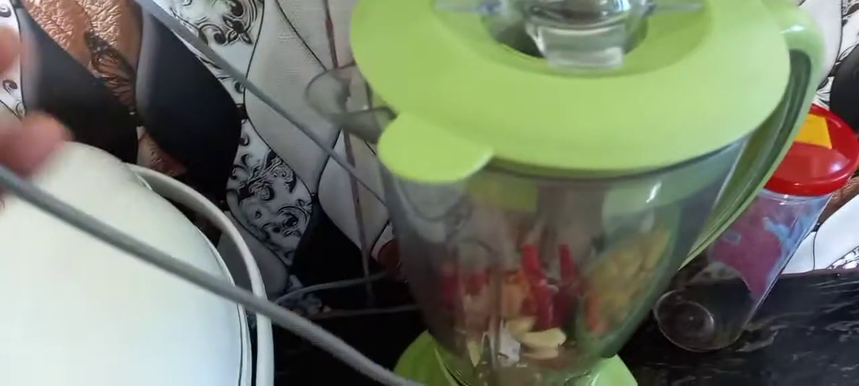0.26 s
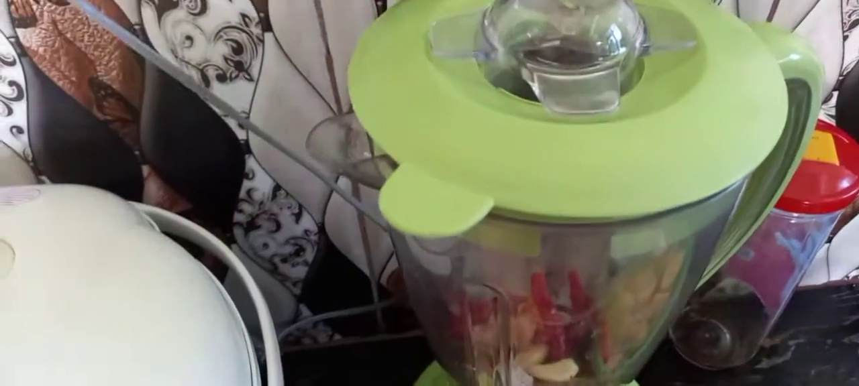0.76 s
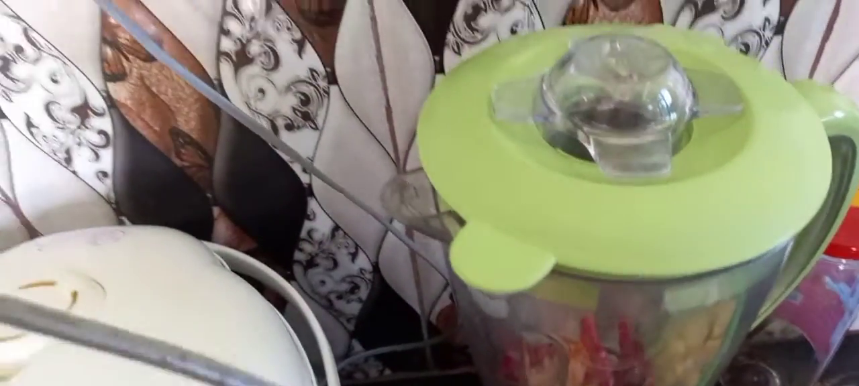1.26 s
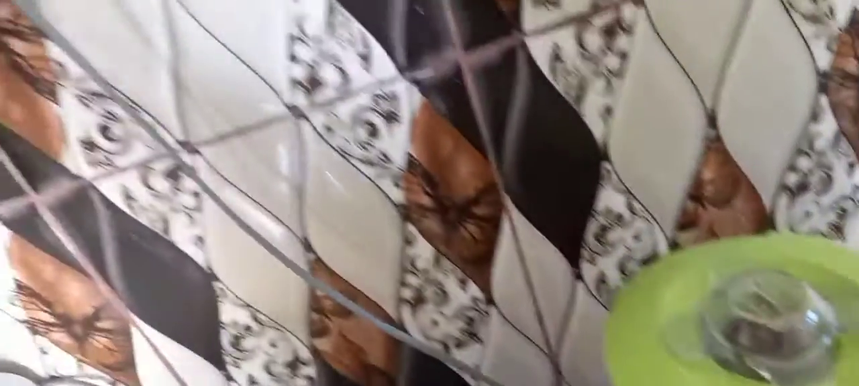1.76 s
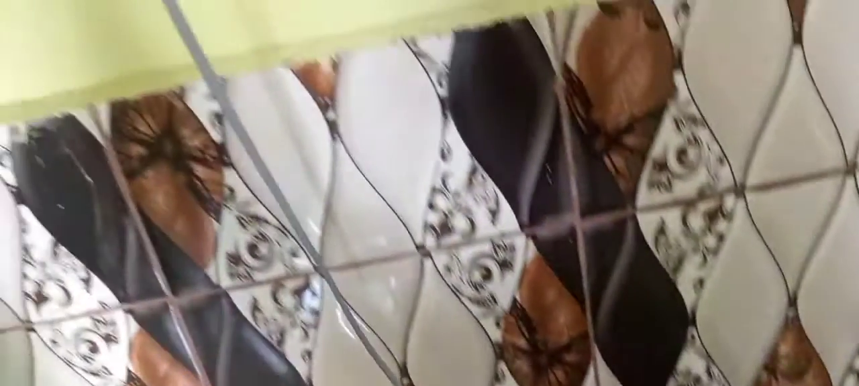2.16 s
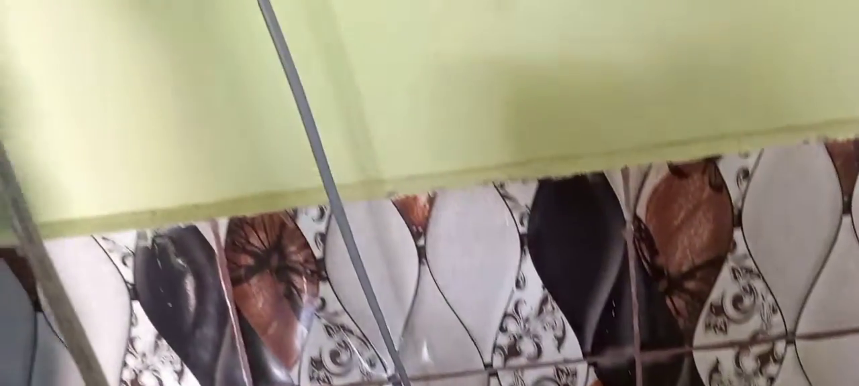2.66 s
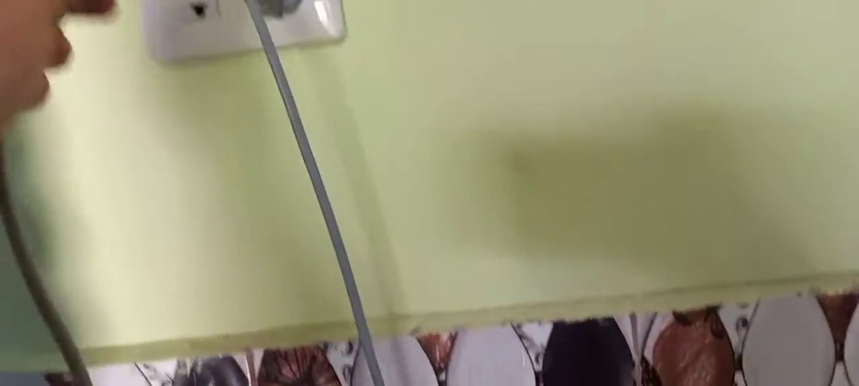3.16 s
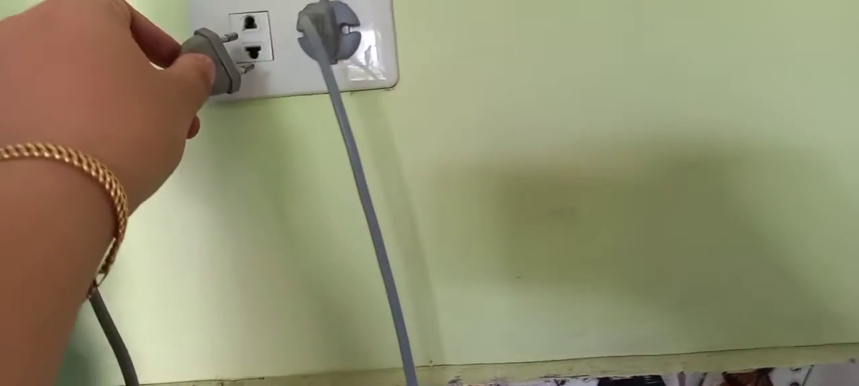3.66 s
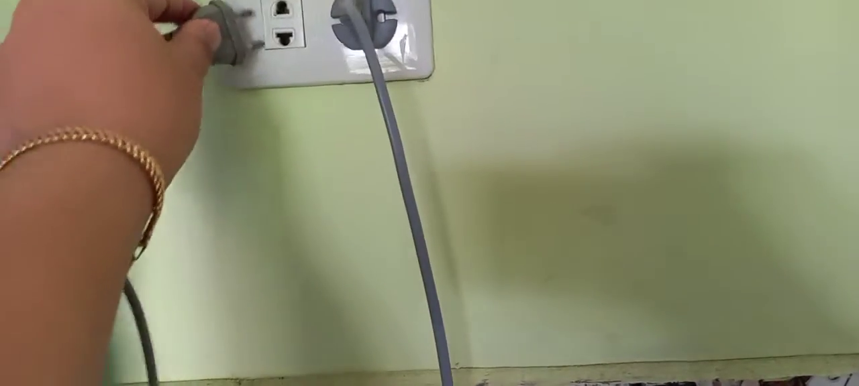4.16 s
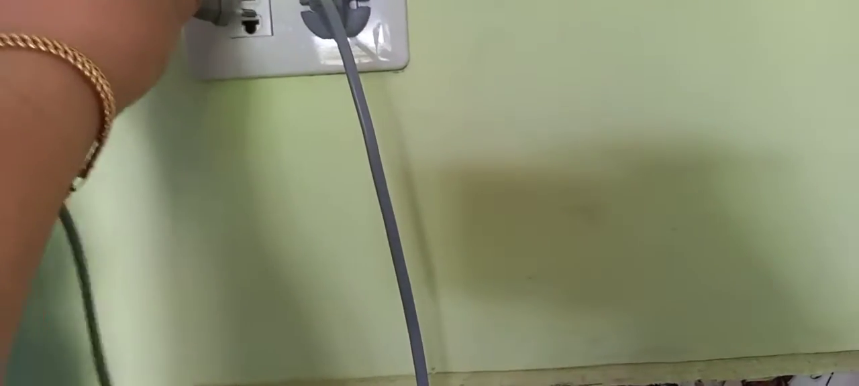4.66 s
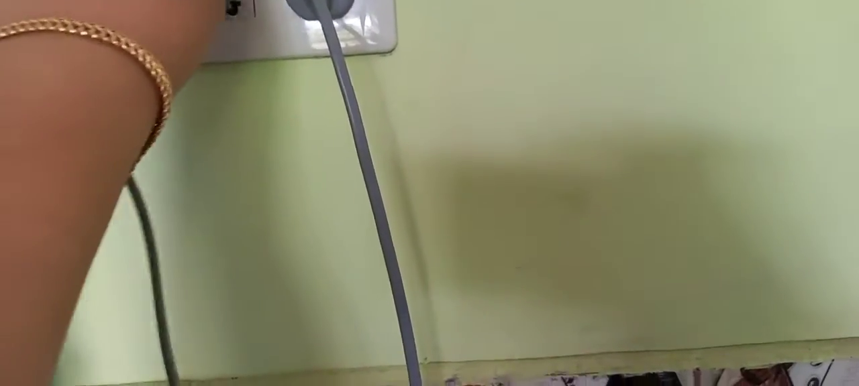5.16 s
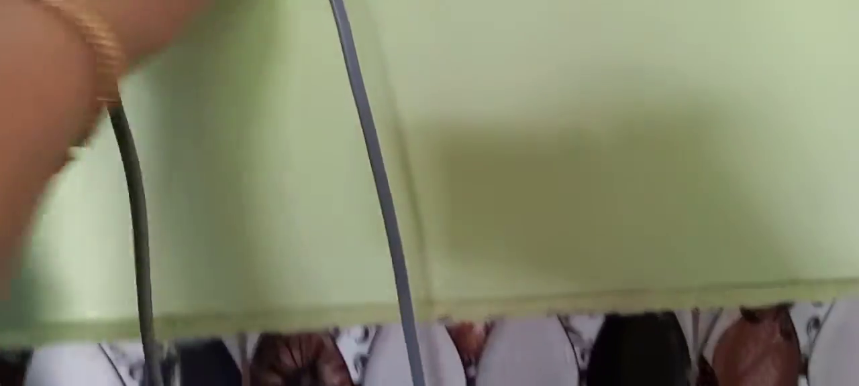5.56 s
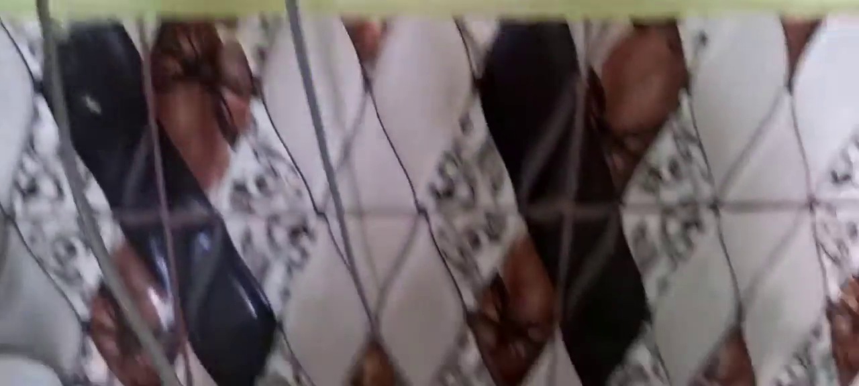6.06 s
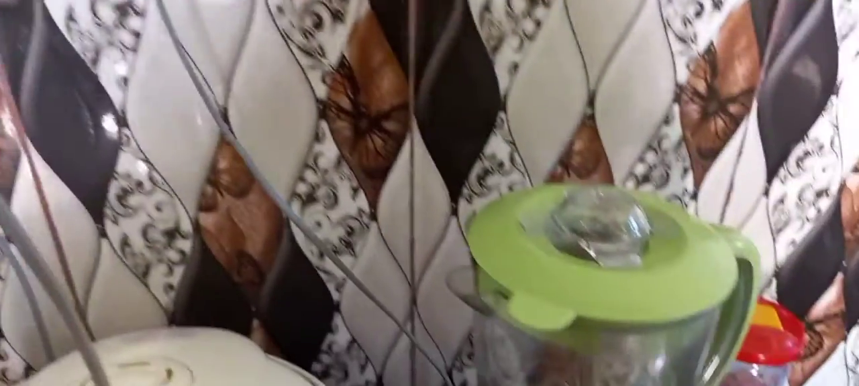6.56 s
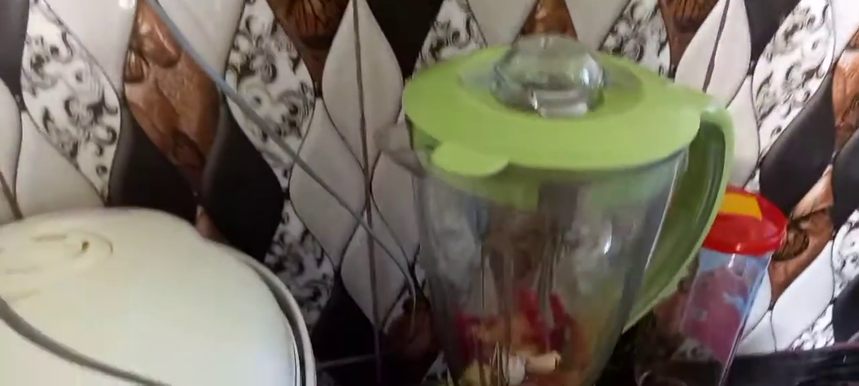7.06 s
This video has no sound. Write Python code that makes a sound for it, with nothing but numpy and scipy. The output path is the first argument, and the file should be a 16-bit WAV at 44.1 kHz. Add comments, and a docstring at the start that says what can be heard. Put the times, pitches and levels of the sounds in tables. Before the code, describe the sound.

A handheld microphone picks up low finger booms and soft skin rubbing, early and again late. A cord drags with uneven catches, gives a high rough squeak and cracks taut. A double knock of a plug on the wall blooms into the hard-walled kitchen. Then bright pin clicks and dull box thuds as it is pushed into the socket, a crisp switch snap, scattered plastic ticks, and quiet room hum.

```python
"""In a tiled kitchen, over a faint hum, a hand draws a power cord along; catches over skin and a squeak end in a slap.
The lifted plug then knocks on the wall: a short burst of ringing modes, with a swelling echo behind it.
Later the plug is tried against a wall socket and pushed home in double clacks, pin clicks over box thuds.
Between two of these a switch snaps, bright and thin; light plastic ticks are scattered about.
Early and late, fingers make the microphone case boom and rub, and a moving arm brushes faintly."""
import sys
import numpy as np
from scipy import signal
from scipy.fft import rfft, irfft, next_fast_len
from scipy.io import wavfile

SR = 44100
rng = np.random.default_rng(int(sys.argv[2]) if len(sys.argv) > 2 else 0)


def generate_wav(sig):
    """Save sig (samples, or channels by samples) to the path in sys.argv[1] as 16-bit PCM at SR."""
    pcm = np.round(np.clip(np.atleast_2d(sig).T, -1, 1) * 32767).astype(np.int16)
    wavfile.write(sys.argv[1], SR, pcm)


N = 323253


def cord_slide():
    """The cord slips over skin in uneven little catches; a faster pull excites a rough, gliding squeak."""
    # How hard the cord is pulled through the hand. Each row: time in seconds, friction level in dB.
    pull = [(0, -57.5), (.11, -57.5), (.21, -47), (.53, -47), (.595, -47.5), (.625, -39), (.652, -36),
            (.666, -41), (.685, -35.5), (.712, -40), (.726, -39.5), (.8, -52)]
    # Spectrum of the sliding rasp. Each row: frequency in Hz, relative density in dB per Hz.
    slide_colour = [(120, -79), (200, -11.5), (430, 1.5), (534, -12), (783, -0.5), (890, -7.5), (1510, -3),
                    (2420, -2.5), (3180, -25), (3550, -11.5), (4580, -18.5), (6830, -15.5), (8200, -23),
                    (15500, -27)]
    # Resonances of the cord in the hand, a plain list of centre frequencies in Hz.
    streaks_hz = [1050, 1400, 1700, 2080, 2330, 2750]
    # Pitch of the squeak, sagging as the cord drags, jumping with the tug. Each row: time in seconds, pitch in Hz.
    squeak_pitch = [(.2, 3130), (.38, 3220), (.53, 3110), (.575, 2890), (.615, 2900), (.64, 3180),
                    (.72, 3170)]
    stop_db_per_s = 158  # the friction dies once the cord is taut
    squeak_onset_db = -34.5  # friction level at which the squeak takes over
    squeak_growth = 0.61  # extra dB of squeak per dB of friction
    catches_per_s, catch_s, catch_depth = 70, 0.004, 1.0
    streak_wander = 0.06  # as a fraction of the centre frequency

    t = np.arange(N) / SR
    pull_db = level(pull) - stop_db_per_s * np.clip(t - pull[-1][0], 0, 1)
    friction = from_db(pull_db)
    squeak = from_db(pull_db + squeak_growth * (pull_db - squeak_onset_db))

    snags = rng.random(N) < catches_per_s / SR
    held = signal.lfilter([1], [1, -np.exp(-1 / (catch_s * SR))], snags + 1e-18)
    catches = rms_one(1 + catch_depth * np.tanh(held))

    slips = (rng.random(N) < 900 / SR) * rng.choice([-1, 1], N)  # about 900 per second
    rasp = tint(rms_one(diffuse(N) + rms_one(slips)), slide_colour) * catches

    # the shifting grasp lets one resonance of the cord after another stand out
    streaks = np.zeros(N)
    for hz in streaks_hz:
        streak = wavering(hz * (1 + streak_wander * drift(14)), 70)
        streaks += streak * from_db(5 * np.tanh(drift(30)))

    pitch_hz = np.interp(t, *np.transpose(squeak_pitch))
    whistle = from_db(-3) * wavering(pitch_hz, width_hz=85)
    fringe = from_db(-3) * rms_one(resonate(resonate(diffuse(N), 3430, 400), 2480, 500))

    slide = friction * (from_db(-2) * rasp + from_db(-7) * rms_one(streaks))
    cord = pan(-12) * (slide + squeak * catches * (whistle + fringe))
    return cord + kitchen(cord.mean(0), near_db=-2, tail_db=-10)


def cord_slap():
    """The cord pulls taut and slaps: short modes with a hard crack."""
    # Cord snapping taut. Each row: time in seconds, body drive in dB, crack drive in dB.
    slaps = [(0.7315, -14, -20.5), (0.7348, -15.5, -31), (0.755, -26, -35), (0.785, -31, -41)]
    # Ring of the cord. Each row: frequency in Hz, relative level in dB, 60 dB decay in seconds.
    cord_modes = [(353, -27.5, 0.046), (1090, -8, 0.014), (1690, 2, 0.0061), (2002, 1, 0.0021),
                  (3230, -5, 0.002)]
    out = np.zeros(N)
    for s, body_db, _ in slaps:
        add(out, s, from_db(body_db) * ring(cord_modes, contact_s=0.00026, vary_db=2))
    times, _, crack_db = np.transpose(slaps)
    body = from_right(out, edge_hz=790, shade_db=-7)
    room = kitchen(out, near_db=-2, tail_db=-12.5)
    return body + room + crack(times, crack_db, decay_s=0.0021, tail_db=-24.5)


def wall_knock():
    """The plug hits the wall and bounces; the whole panel radiates into the room."""
    # Plug against the wall. Each row: time in seconds, body drive in dB, crack drive in dB.
    knocks = [(1.9976, -7, -43.5), (2.0031, -7, -38.5), (2.0110, -24.5, -56), (2.0235, -24.5, -50)]
    # Ring of the knock. Each row: frequency in Hz, relative level in dB, 60 dB decay in seconds.
    knock_modes = [(630, -14, 0.014), (970, -14, 0.0073), (1320, 2, 0.013), (1500, -4, 0.019),
                   (2070, -11, 0.016), (2570, -11.5, 0.011), (3700, -24.5, .012)]
    # The plug's free pins and the wall ring on. Each row: frequency in Hz, level in dB, 60 dB decay in seconds.
    after_ring = [(830, -47, .35), (1225, -41, .4), (5636, -46, .26), (5720, -48, .16), (6300, -45, .12),
                  (7130, -41, .11)]
    # Spectrum of the swelling echo. Each row: frequency in Hz, relative density in dB per Hz.
    echo_colour = [(250, -25.5), (600, -6.5), (1000, -0.5), (1400, -8.5), (2100, -4), (2700, -14),
                   (3300, -22), (6800, -24.5), (8000, -51)]
    out = np.zeros(N)
    for s, body_db, _ in knocks:
        add(out, s, from_db(body_db) * ring(knock_modes, contact_s=0.00107, vary_db=1))
    out = signal.sosfilt(signal.butter(2, 480, "high", fs=SR, output="sos"), out)
    times, _, crack_db = np.transpose(knocks)
    direct = from_right(out, edge_hz=400, shade_db=-14, lag_s=0.00005)

    t = np.arange(SR) / SR
    swell_and_fade = (1 - np.exp(-t / 0.0013)) * np.exp(-t / 0.091)
    echo = np.zeros((2, N))
    add(echo, times[0], pan(-6) * ring(after_ring, contact_s=0.002, vary_db=0))
    add(echo, times[0], pan(-2) * from_db(-33.5) * swell_and_fade * tint(diffuse(SR), echo_colour))
    room = kitchen(out, near_db=-8, tail_db=-13.5)
    return direct + echo + room + crack(times, crack_db, decay_s=0.011, tail_db=-16)


def plugging():
    """Pins click on the contacts and the hollow box thuds behind them."""
    # Plug in the socket. Each row: time in seconds, box thud drive in dB, pin click drive in dB,
    # thud tilt in dB per octave, box pitch as a ratio.
    contacts = [(4.203, -32, -29, 0, 1.07), (4.2165, -39.5, -13.5, 10.5, 1.02), (4.358, -44, -63, 2, 1.13),
                (4.4621, -34.5, -29, -7.5, 1.17), (4.7352, -29, -10, 0, 1.03),
                (4.7469, -28.5, -4.5, 6.5, 0.98), (4.7515, -34, -22, -1, 1.23),
                (5.0158, -37, -39, -7, 0.97), (5.2469, -27, -11.5, 0.5, 0.91),
                (5.2620, -26, -24, -17, 0.88), (5.2655, -25.5, -15, 6, 0.88)]
    # Hollow socket box. Each row: frequency in Hz before the pitch ratio, relative level in dB,
    # 60 dB decay in seconds.
    box_modes = [(350, -9, .035), (470, -7, .04), (585, 0, .036), (690, -5, .03), (870, -13, .02),
                 (1050, -4, .022), (1340, -16, .02), (2150, -19, .014)]
    # Metal pins. Each row: frequency in Hz, relative level in dB, 60 dB decay in seconds.
    pin_modes = [(3860, -21, 0.014), (5370, -4.5, 0.0062), (5750, -3, 0.0038), (6370, 0.5, 0.0064),
                 (6950, -3, 0.0082)]
    thuds, clicks = np.zeros((2, N))
    for s, box_db, pin_db, tilt_db, pitch in contacts:
        pressed = np.array(box_modes) * [pitch, 1, 1]
        thud = ring(pressed, contact_s=0.00128, vary_db=2.5, tilt_db=tilt_db)
        add(thuds, s, from_db(box_db) * thud)
        add(clicks, s, from_db(pin_db) * ring(pin_modes, contact_s=0.001333, vary_db=2.5))
    # the small box radiates little bass
    thuds = signal.sosfilt(signal.butter(2, 190, "high", fs=SR, output="sos"), thuds)
    times, _, pins_db, *_ = np.transpose(contacts)
    crack_db = -23 + 0.69 * pins_db  # the plug's shell cracks along with the pin clicks
    direct = from_right(thuds + clicks, edge_hz=260, shade_db=-8.5, lag_s=-0.000197)
    room = kitchen(thuds, near_db=-3, tail_db=-6) + kitchen(clicks, near_db=-14, tail_db=-16.5)
    return direct + room + crack(times, crack_db, decay_s=0.003, tail_db=-18.5)


def switch():
    """The sprung rocker flips with a thin, bright snap."""
    # The snap of the switch. Each row: time in seconds, body drive in dB, crack drive in dB.
    snaps = [(4.503, -25.5, -29)]
    # Ring of the rocker. Each row: frequency in Hz, relative level in dB, 60 dB decay in seconds.
    switch_modes = [(450, -21, .03), (700, -14, .02), (1650, -6, .028), (2050, -5, .028), (2280, -4, .025),
                    (3400, -3, .01), (7000, -2, .013), (8600, 3, .007), (11000, 3, .005), (12800, 3, .005),
                    (14800, 2, .005)]
    out = np.zeros(N)
    for s, body_db, _ in snaps:
        add(out, s, from_db(body_db) * ring(switch_modes, contact_s=0.000467, vary_db=1))
    times, _, crack_db = np.transpose(snaps)
    body = from_right(out, edge_hz=420, shade_db=-17, lag_s=-0.00013)
    room = kitchen(out, near_db=-4, tail_db=-9)
    return body + room + crack(times, crack_db, decay_s=0.0061, tail_db=-12)


def ticks():
    """Light touches of plastic on plastic, each with its own place between the ports."""
    # Plastic ticks. Each row: time in seconds, body drive in dB, crack drive in dB, tilt in dB per octave,
    # left minus right in dB before the case's shading.
    touches = [(1.7896, -58, -42.5, 4, -2), (1.8972, -50.5, -46.5, 2, -11), (1.9236, -46, -45.5, 5, -12),
               (2.0950, -28, -36, 4.5, -1), (3.1169, -38, -41, 3, 9), (3.1200, -31.5, -46, 0, -13),
               (3.5232, -58, -43, -4, 5), (4.6429, -36.5, -43.5, -4, 3), (5.012, -45, -41, 1.5, 4),
               (5.0979, -43, -43, -4, 0), (5.4046, -56, -43, -3, 3), (5.4518, -37.5, -44, 3.5, -3),
               (5.5190, -40, -57, 3, -1), (5.5255, -42.5, -55, 1, -3), (5.5336, -38, -53, 0, -5),
               (7.1355, -38, -49.5, -3, 15.5), (7.263, -34, -49.5, -8, 20), (7.2750, -34, -47, -12, 27)]
    # Ring of the ticks. Each row: frequency in Hz, relative level in dB, 60 dB decay in seconds.
    tick_modes = [(520, -14, .01), (1050, -7, .011), (1500, -4, .011), (2200, -1, .011), (4100, -7, .008)]
    out = np.zeros((2, N))
    for s, body_db, _, tilt_db, pan_db in touches:
        tick = from_db(body_db) * ring(tick_modes, contact_s=0.0006, vary_db=1.5, tilt_db=tilt_db)
        add(out, s, pan(pan_db) * from_right(tick, edge_hz=880, shade_db=-17.5))
    times, _, crack_db, _, pan_db = np.transpose(touches)
    room = kitchen(out.mean(0), near_db=-2, tail_db=-4)
    return out + room + crack(times, crack_db, decay_s=0.003, tail_db=-22, pan_db=pan_db)


def grip():
    """Fingers creep on the case next to the right port: it booms at one low resonance, the skin rubs and bumps."""
    # Fingers shift on the microphone case. Each row: start in seconds, length in seconds,
    # boom level in dB, skin rub level in dB, both before panning.
    shifts = [(0, 0.019, -46, -50.5), (0.181, 0.04, -38, -46), (0.237, 0.21, -57.5, -49.5),
              (0.61, 0.093, -56, -50.5), (0.739, 0.022, -33.5, -40), (0.796, 0.066, -38, -46.5),
              (0.896, 0.013, -30.5, -45.5), (0.916, 0.12, -51.5, -46), (1.052, 0.13, -56, -41),
              (1.18, 0.095, -43.5, -51.5), (1.386, .11, -40.5, -59), (1.504, 0.077, -30.5, -53),
              (1.666, 0.025, -53.5, -72), (1.823, 0.059, -46.5, -59), (5.222, 0.081, -46, -49),
              (5.462, 0.12, -73, -52.5), (5.649, 0.1, -42.5, -55.5), (5.768, 0.064, -47, -67),
              (5.835, 0.054, -31, -53.5), (5.928, 0.054, -42, -51), (5.981, 0.16, -64, -55),
              (6.63, 0.075, -51.5, -55)]
    # Spectrum of the skin rub. Each row: frequency in Hz, relative density in dB per Hz.
    rub_colour = [(60, -3.5), (130, 7.5), (200, -9.5), (330, -4.5), (550, -11.5), (900, -20.5), (2000, -36),
                  (5000, -56.5)]
    # Fingers bumping the case. Each row: time in seconds, drive in dB.
    finger_bumps = [(0.284, -30.5), (0.368, -36), (0.938, -33), (1.071, -32), (1.147, -26.5),
                    (1.207, -37.5)]
    # Dull ring of the case. Each row: frequency in Hz, relative level in dB, 60 dB decay in seconds.
    case_modes = [(175, -8, 0.03), (220, -6, 0.058), (320, -8, 0.056), (480, -6, 0.046), (640, -14, 0.047)]
    starts, lengths, boom_db, rub_db = np.transpose(shifts)
    # every shift swells, holds and dies alike
    boom = strokes(starts, lengths, boom_db, attack_s=0.022, release_s=0.02)
    rub = strokes(starts, lengths, rub_db, attack_s=0.022, release_s=0.02)

    case = signal.hilbert(resonate(resonate(rng.standard_normal(N), 72.0, 35), 80.7, 42))
    # steady friction keeps the swing even, and the case rounds it off
    swing = case.real / (np.abs(case) + 0.1 * np.std(case))
    even = rms_one(resonate(resonate(swing, 82, 45), 82, 60))
    # upper resonance of the case, relative to its boom
    overtone = from_db(-14.5) * wavering(np.full(N, 144.2), width_hz=35)

    skin = tint(diffuse(N), rub_colour) * from_db(2 * drift(50))
    bumps = np.zeros(N)
    for s, db in finger_bumps:
        add(bumps, s, from_db(db) * ring(case_modes, contact_s=0.00294, vary_db=1))
    return boom * (pan(-42) * even + pan(-22) * overtone) + pan(-5.5) * (rub * skin + bumps)


def background():
    """Low room hum, airy hiss, and the faint brushing of sleeve and cord as the arm moves."""
    # Level of the low room hum. Each row: time in seconds, level in dB.
    hum_level = [(0, -53.5), (2.5, -62.5), (2.75, -55.5), (3.65, -56), (3.87, -64), (5.3, -56), (7.33, -61)]
    # Spectrum of the hum. Each row: frequency in Hz, relative density in dB per Hz.
    hum_colour = [(25, -33.5), (50, -13.5), (75, -3), (95, -2), (130, -9), (180, -18), (300, -28.5),
                  (600, -66.5)]
    # Level of the hiss. Each row: time in seconds, level in dB before panning.
    air_level = [(0, -53), (1.6, -63.5), (3.1, -63.5), (3.9, -62), (5.5, -60.5), (6.35, -64.5), (7.33, -60)]
    # Spectrum of the hiss. Each row: frequency in Hz, relative density in dB per Hz.
    air_colour = [(120, -36), (200, -8), (304, -4.5), (327, -5.5), (385, 1.5), (471, 1), (515, -4.5),
                  (798, -8), (874, -15.5), (1210, -17.5), (2170, -7.5), (3550, -27), (6830, -16.5),
                  (7760, -29), (15500, -36)]
    # Sleeve and cord brush. Each row: start in seconds, length in seconds, level in dB before panning.
    brushes = [(0.736, 0.22, -59), (0.93, 0.45, -68.5), (1.414, 0.23, -65.5), (1.764, 0.47, -61.5),
               (2.65, 0.67, -73), (3.5, 0.1, -66), (3.895, 0.14, -66), (4.284, 0.13, -60.5),
               (4.52, 0.41, -63.5), (5.22, 0.14, -54.5), (5.364, 0.18, -60), (5.908, 0.12, -64),
               (6.78, 0.067, -69), (6.936, 0.07, -71), (7.225, 0.064, -66)]
    # Spectrum of the brushing. Each row: frequency in Hz, relative density in dB per Hz.
    brush_colour = [(500, -9), (2200, 3.5), (4000, -4.5), (6700, -2), (8000, -12), (12000, -15),
                    (16000, -19.5)]
    rustle = from_db(-78)  # faint, always there, also between strokes
    brush = rustle + strokes(*np.transpose(brushes), attack_s=0.05, release_s=0.019)
    low = from_db(level(hum_level)) * tint(diffuse(N), hum_colour)
    hiss = from_db(level(air_level)) * tint(diffuse(N), air_colour)
    cloth = brush * from_db(2.6 * drift(49)) * tint(diffuse(N), brush_colour)
    return low + pan(-6) * hiss + pan(-5) * cloth


def kitchen(x, near_db, tail_db):
    """Quick echoes off the nearby tiles, then a diffuse tail that dies band by band."""
    # Decay of the room. Each row: frequency in Hz, 60 dB decay in seconds.
    room_t60 = [(150, 1), (500, 0.47), (1200, 0.7), (2500, 0.77), (6000, 0.32), (14000, 0.74)]
    # Strength of the tail. Each row: frequency in Hz, relative level in dB.
    room_colour = [(150, -7), (500, 5.5), (1200, -2), (2500, -0.5), (6000, -12.5), (14000, 5)]
    t = np.arange(int(SR * 0.8)) / SR
    near = diffuse(len(t)) * np.exp(-t / 0.0011) * (t > 0.002)
    tail = np.zeros((2, len(t)))
    edges = np.geomspace(100, 17000, 11)
    for low, high in zip(edges, edges[1:]):
        hz = np.sqrt(low * high)
        sos = signal.butter(2, [low, high], "band", fs=SR, output="sos")
        band = signal.sosfilt(sos, diffuse(len(t)))
        tail += band * from_db(at_hz(room_colour, hz) - 60 * t / at_hz(room_t60, hz))
    tail = tail * (1 - np.exp(-(t / 0.004) ** 2))
    response = from_db(near_db) * rms_one(near) + from_db(tail_db) * rms_one(tail)
    response = response / np.sqrt(len(t))
    return pan(-0.5) * signal.fftconvolve(x[None], response, axes=1)[:, :N]


def crack(times, levels_db, decay_s, tail_db, pan_db=0):
    """Dense, short-lived high modes of hard plastic; thrown in all directions, they return as a smooth hiss."""
    # Spectrum of the crack. Each row: frequency in Hz, relative density in dB per Hz.
    crack_colour = [(400, -23.5), (1500, -1.5), (3000, -1), (5500, 0.5), (7000, 3), (7900, -8), (12000, -8),
                    (16000, -21)]
    power = np.zeros((2, N))
    at = (np.array(times) * SR).astype(int)
    power[:, at] = from_db(2 * np.array(levels_db) + np.array(pan_db) * [[1], [-1]])

    def envelope(blows, s):
        """Amplitude that each blow starts and that falls by 1/e in s seconds."""
        return np.sqrt(signal.lfilter([1], [1, -np.exp(-2 / (s * SR))], blows + 1e-18))

    hiss = tint(rng.standard_normal(N), crack_colour)
    direct = envelope(power, decay_s) * from_right(hiss, edge_hz=590, shade_db=-12, lag_s=-0.00019)
    echo = envelope(power.mean(0), 0.061) * tint(diffuse(N), crack_colour)
    return direct + pan(-1.3) * from_db(tail_db) * echo


def ring(modes, contact_s, vary_db, tilt_db=0):
    """One blow: the modes swell during the contact and die; a tilt per octave pivots on the second mode."""
    t = np.arange(SR // 2) / SR
    hz, db, t60 = np.transpose(modes)[:, :, None]
    db = db + tilt_db * np.log2(hz / hz[1]) + vary_db * rng.standard_normal(db.shape)
    strength = from_db(db - 60 * t / t60)
    swell = 1 - np.exp(-(t / contact_s) ** 2)
    return (strength * np.sin(2 * np.pi * hz * (t - contact_s))).sum(0) * swell


def from_right(x, edge_hz, shade_db, lag_s=0):
    """The microphone case shades the left port from treble, and the ports hear a blow slightly apart."""
    bass = signal.sosfilt(signal.butter(1, edge_hz, fs=SR, output="sos"), x)
    t = np.arange(len(x)) / SR
    shaded = bass + from_db(shade_db) * (x - bass)
    return np.array([np.interp(t - lag_s, t, shaded), x])


def diffuse(size):
    """Stereo noise from all around, most alike at the two ports in the bass."""
    # Likeness of the two ports. Each row: frequency in Hz, left-right correlation as a ratio.
    likeness = [(50, 0.63), (150, 0.96), (500, 0.56), (1000, 0.05), (2500, 0.083), (12000, 0.033)]
    padded = next_fast_len(size)
    mid, side = rfft(rng.standard_normal((2, padded)))
    alike = np.clip(at_hz(likeness, np.fft.rfftfreq(padded, 1 / SR)), 0, 1)
    spectrum = np.sqrt(1 + alike) * mid + np.sqrt(1 - alike) * side * [[1], [-1]]
    return irfft(spectrum, padded)[:, :size] / np.sqrt(2)


def wavering(hz, width_hz):
    """A rough tone that follows a pitch curve; unit power."""
    sos = signal.butter(2, width_hz, fs=SR, output="sos")
    wobble = signal.sosfilt(sos, rng.standard_normal((2, N)))
    phase = 2 * np.pi * np.cumsum(hz) / SR
    return rms_one(wobble[0] * np.cos(phase) + wobble[1] * np.sin(phase))


def resonate(x, hz, width_hz):
    """A two-pole resonance."""
    r = np.exp(-np.pi * width_hz / SR)
    return signal.lfilter([1, 0, -1], [1, -2 * r * np.cos(2 * np.pi * hz / SR), r * r], x)


def tint(x, colour):
    """Give a signal a spectrum; unit power."""
    size = next_fast_len(x.shape[-1])
    gain = from_db(at_hz(colour, np.fft.rfftfreq(size, 1 / SR)))
    return rms_one(irfft(rfft(x, size) * gain, size)[..., :x.shape[-1]])


def strokes(starts, lengths, levels_db, attack_s, release_s):
    """Gain of a series of movements: each swells, holds until its length is over and dies away."""
    out, t = np.zeros(N), np.arange(2 * SR) / SR
    rise = np.sin(np.pi / 2 * np.minimum(t / attack_s, 1)) ** 2
    for s, length, db in zip(starts, lengths, levels_db):
        fall = np.exp(-np.maximum(t - length, 0) / release_s)
        add(out, max(s, 0), from_db(db) * rise * fall)
    return out


def drift(rate):
    """Slow chance: straight lines between random knots of spread 1, rate knots per second."""
    knots = np.arange(N) / SR * rate
    return np.interp(knots, np.arange(4000), rng.standard_normal(4000))


def level(rows):
    """A level curve in dB for every sample."""
    return np.interp(np.arange(N) / SR, *np.transpose(rows))


def at_hz(points, hz):
    """Read a table on a log-frequency axis."""
    f, value = np.transpose(points)
    return np.interp(np.log(np.maximum(hz, 1)), np.log(f), value)


def from_db(db):
    """Decibels to gain."""
    return 10 ** (np.asarray(db) / 20)


def rms_one(x):
    """Scale to unit power."""
    return x / np.sqrt(np.mean(x ** 2) + 1e-20)


def pan(db):
    """Left and right gains, left minus right in dB, whose mean is 1."""
    sides = from_db(np.array([[db], [-db]]) / 2)
    return sides / sides.mean()


def add(out, s, sound):
    """Mix a sound in at a time in seconds."""
    at = int(s * SR)
    out[..., at:at + sound.shape[-1]] += sound[..., :N - at]


def scene():
    """All sources at the two ports of the microphone."""
    cord = cord_slide() + cord_slap()
    plug = wall_knock() + plugging()
    return cord + plug + switch() + ticks() + grip() + background()


def record(dry):
    """Deep bass rolls off below 46 Hz and the top is cut at 15.9 kHz."""
    thin = signal.sosfilt(signal.butter(4, 46, "high", fs=SR, output="sos"), dry)
    return signal.sosfilt(signal.ellip(10, 0.1, 80, 15900, fs=SR, output="sos"), thin)


dry = scene()
out = record(dry)
generate_wav(out)
```